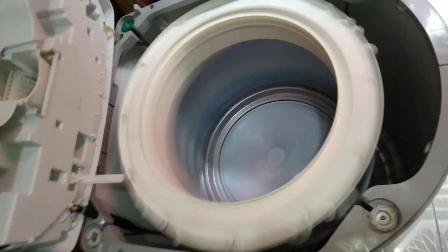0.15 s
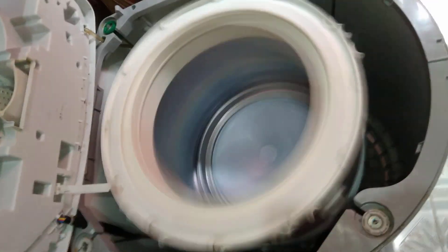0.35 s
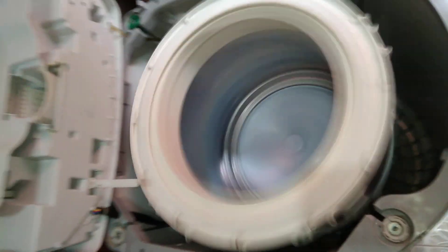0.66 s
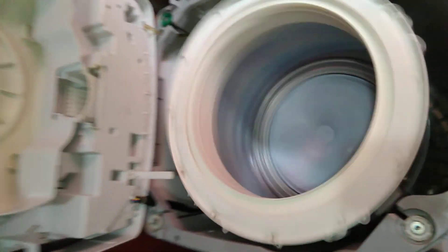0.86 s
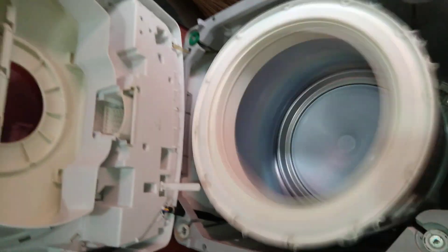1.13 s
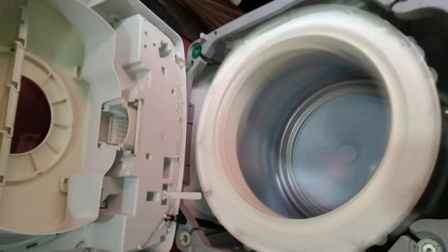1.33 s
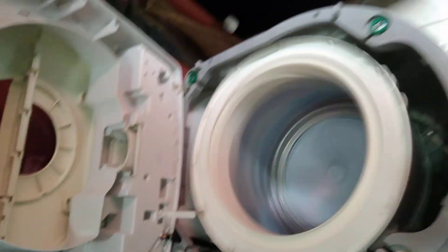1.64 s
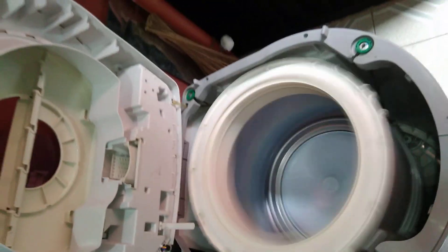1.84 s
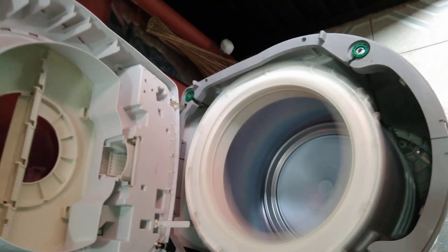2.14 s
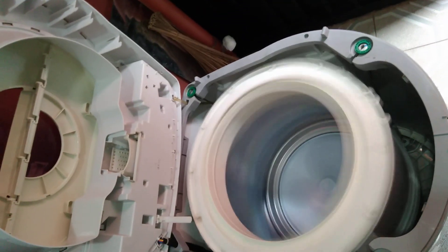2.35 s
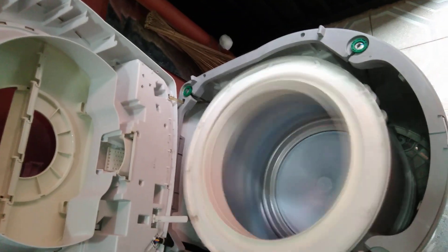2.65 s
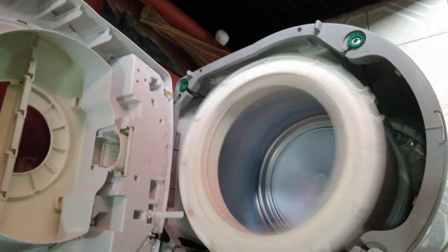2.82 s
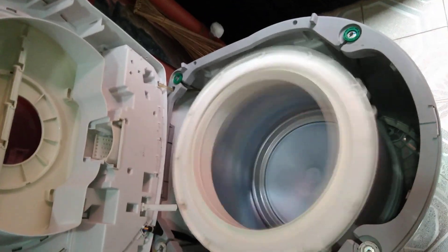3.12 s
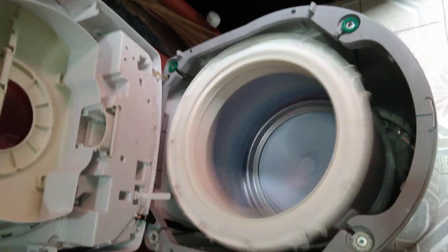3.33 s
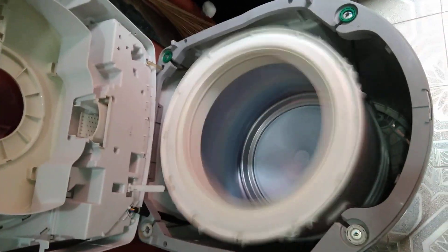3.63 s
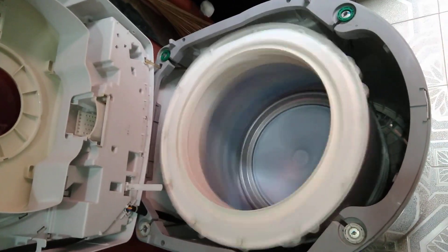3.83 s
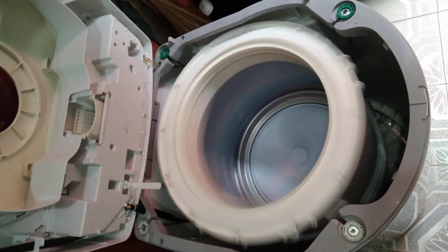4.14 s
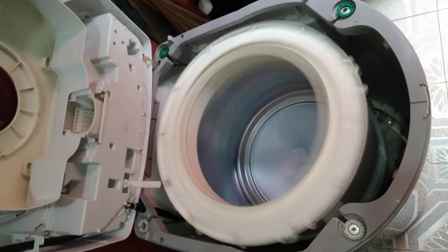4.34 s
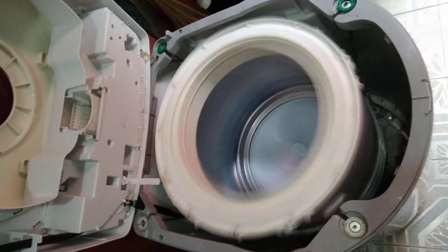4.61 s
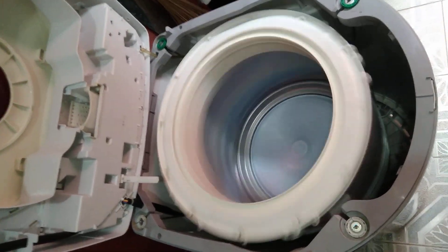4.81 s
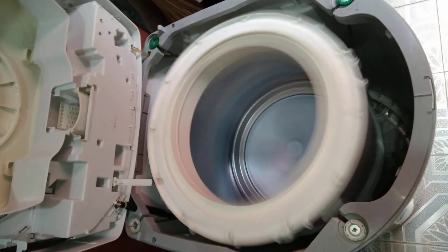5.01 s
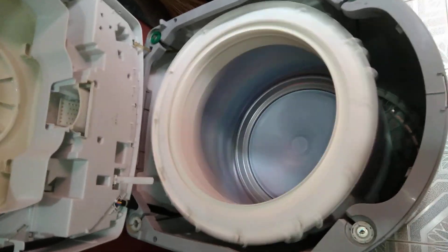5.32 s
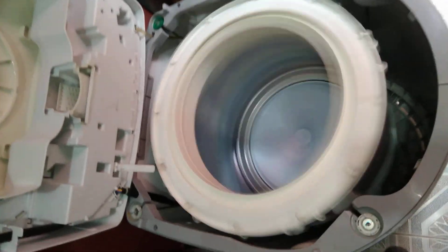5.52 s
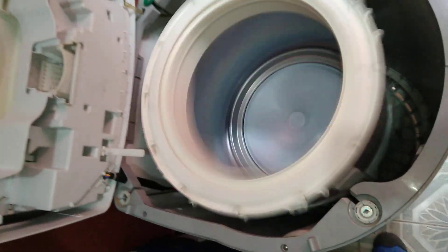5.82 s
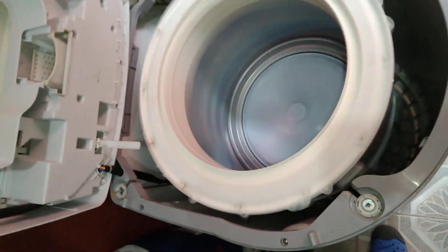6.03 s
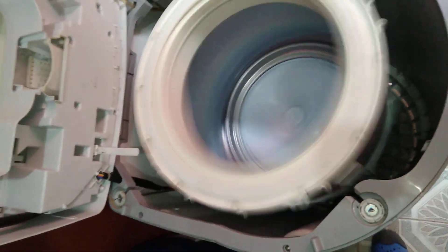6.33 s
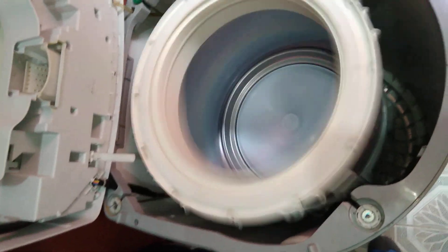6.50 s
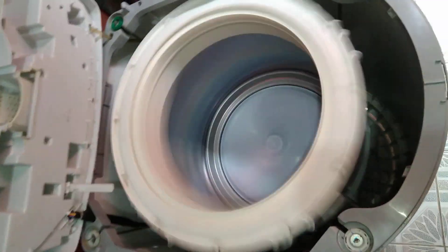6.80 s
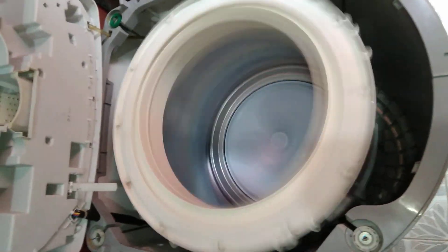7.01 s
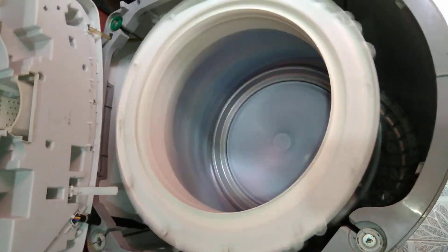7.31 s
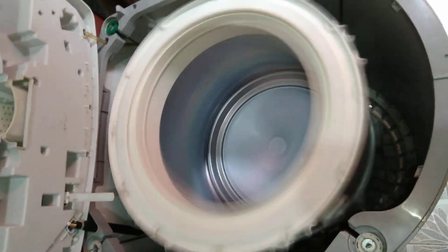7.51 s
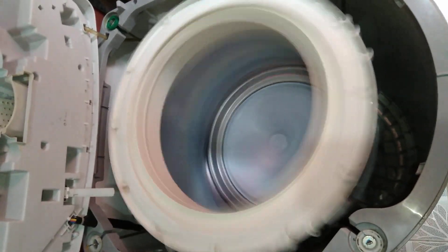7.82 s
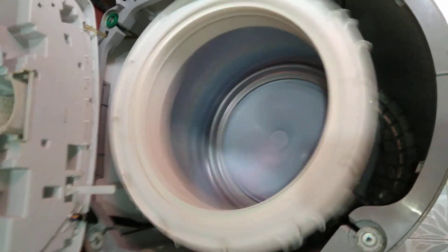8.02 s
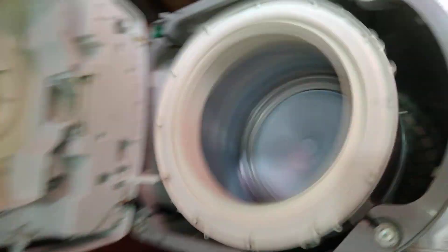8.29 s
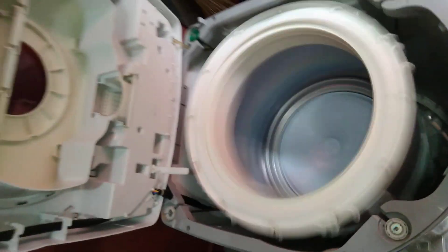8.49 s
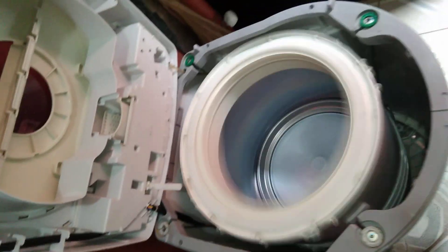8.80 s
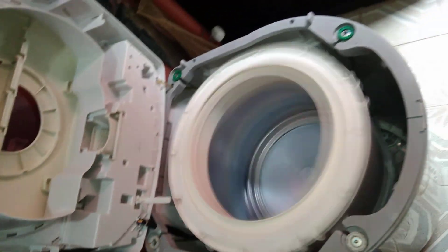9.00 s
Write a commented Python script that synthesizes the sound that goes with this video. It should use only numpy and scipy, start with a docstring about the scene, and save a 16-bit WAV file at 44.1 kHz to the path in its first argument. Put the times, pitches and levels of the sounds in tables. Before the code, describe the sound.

Fast, rhythmic metal clattering from a spinning washer tub drops to quiet knocking, then returns as the motor pulls again.

```python
"""A top-loading washer with its cover off spins an empty tub. At first the motor hums, the cabinet booms,
and a loose part slaps four times a turn, rattling through the tub and the sheet-metal cabinet.
From about 3.3 s the tub coasts: the same contact only knocks softly over a faint whir. Faint, brief high
chirps follow the knocks, and the level dips a few times. Near 5.8 s the motor pulls again and the
suspension groans. The slaps come back, a few at first, then steadily from about 7.4 s."""
import sys
import numpy as np
from scipy import signal
from scipy.io import wavfile
from scipy.ndimage import uniform_filter1d

SR = 44100
rng = np.random.default_rng(int(sys.argv[2]) if len(sys.argv) > 2 else 0)


def persist_wave(psi):
    """Save psi, clipped to +-1, as 16-bit WAV."""
    counts = np.round(np.clip(psi, -1, 1) * 32767).astype(np.int16)
    wavfile.write(sys.argv[1], SR, np.atleast_2d(counts).T)


N = 403515

# Whir of bearings and air: t/s, level/dB, extra treble/dB
WHIR_LEVELS = [(0.0, -13, 3.5), (0.84, -18.5, 1), (2.62, -13.5, 7), (2.93, -24, 0), (3.11, -24, -6.5),
               (3.67, -37.5, -3.5), (4.7, -40, 1.5), (5.2, -40, -1), (5.81, -35, -0.5), (5.94, -42.5, -1),
               (6.6, -44, -0.5), (7.0, -41, 2.5), (7.45, -36, -5.5), (7.65, -23.5, -7.5), (8.36, -23, -1),
               (9.15, -17, 5)]
# Tone colour of the whir: f/Hz, level/dB
WHIR_COLOUR = [(18, -42), (30, -12.5), (134, -2.5), (204, -1), (822, -13.5), (1160, -7), (1320, -21.5),
               (1500, -10.5), (1760, -12), (2120, -13.5), (2680, -25), (5400, -28), (6900, -24.5),
               (10000, -23), (12000, -43), (16000, -39.5)]
# How far the tub has turned: t/s, angle/turns
TUB_TURNS = [(-0.27, -1), (2.837, 9), (6.473, 20), (7.135, 22), (9.37, 29)]
# Base pitch of the magnetic hum, which sounds at twice and three times this: t/s, f/Hz
HUM_PITCH = [(0, 60.17), (3.2, 59.44), (5.8, 58.96), (9.15, 59.27)]
# Motor sounds: t/s, low hum/dB, cabinet boom/dB, high hum/dB
MOTOR_LEVELS = [(0.0, -22.5, -26, -20), (0.76, -19.5, -25.5, -22.5), (2.0, -24.5, -24.5, -25.5),
                (2.72, -28, -21.5, -25.5), (2.82, -31, -31, -22), (3.08, -36, -22, -30),
                (3.17, -41, -31, -51), (3.3, -42, -29, -42), (3.5, -55, -56, -63), (3.9, -51, -44, -61),
                (4.2, -53, -58, -66), (5.73, -51, -65, -52.5), (5.79, -42, -26.5, -35),
                (5.9, -36, -35, -36), (5.96, -26, -27.5, -37), (6.16, -29, -39, -43),
                (6.29, -22.5, -25.5, -43), (6.46, -23.5, -29, -28.5), (6.8, -28, -28.5, -36),
                (7.02, -22, -29, -42), (7.09, -21.5, -26, -27.5), (7.7, -20, -24.5, -26),
                (7.8, -20.5, -29, -20.5), (9.15, -27, -26, -20)]
# Swell once a turn, a row each for low hum, boom and high hum: depth/dB, loudest at/turns
MOTOR_SWELL = [(1.0, 0.2), (2.5, 0.29), (4.0, 0.065)]
# Deep modes of the cabinet (a mode is a pitch at which a thing likes to ring): f/Hz, width/Hz, level/dB
BOOM_MODES = [(92, 14, -12), (112, 14, -17), (148.6, 30, 0), (236, 8, -19)]
# Groans of the suspension: t/s, low mode/dB, high mode/dB
GROANS = [(5.8, -41, -44.5), (5.975, -56, -61), (6.14, -43.5, -40), (6.395, -34, -47), (6.48, -39, -32),
          (6.62, -64, -54), (6.75, -62, -45), (6.97, -42, -45), (7.15, -48, -40), (7.385, -52, -33)]
# The two modes that groan: f/Hz, width/Hz
GROAN_MODES = [(610, 94), (872, 89)]
# Pitches of the faint high chirps: f/Hz, level/dB
HIGH_CHIRPS = [(4500, -70), (5000, -71), (6350, -60), (6650, -62), (7300, -63), (7700, -62), (8900, -65),
               (9650, -66), (11300, -72), (12800, -71), (13200, -72), (14000, -76), (14800, -73)]
# Soft knocks: t/s, level/dB, then added to that level: bottom mode/dB, low modes/dB, upper modes/dB
KNOCKS = [(3.3692, -31.5, -14, -2, -2), (3.4396, -53, -24, 18, 8), (3.469, -30, -32, -4, 6.5),
          (3.5339, -38, -26, 0, -16), (3.594, -30.5, -2.5, -9, -7), (3.683, -26.5, -11.5, -7, -3.5),
          (3.7509, -29, -26, -11, -15), (3.848, -27, -28, -15, -11), (3.9204, -30, -25, -4.5, -13),
          (4.007, -31.5, -7, -2, -4), (4.081, -28, -5.5, -8, -14), (4.146, -31.5, 4, -6.5, -13),
          (4.249, -24.5, -20, -3.5, -9.5), (4.336, -22.5, -18, -6.5, -10.5), (4.406, -33.5, 1, -4, -5),
          (4.4832, -38, -6, -9, -7), (4.576, -34, -12, -5, -9), (4.6605, -28, -7, -11, -10),
          (4.736, -34.5, -10, -17, -22), (4.8179, -37, -19, -13, -13), (4.9038, -36, -24, -15, -11),
          (4.9906, -31, -12, -6, -21), (5.0754, -35.5, -18, -6, -12), (5.1587, -37.5, -13, -6, -15.5),
          (5.242, -34, -23, -9, -8.5), (5.3224, -38, -18.5, -23, -4), (5.494, -32, -5, -25, -22),
          (5.587, -40.5, -24, 7.5, -22), (5.7673, -50.5, 0.5, -11, 18.5), (6.189, -51, -4, 1, -7),
          (6.6957, -48, -17, 5, 3.5), (6.778, -47, -26, -10, 0), (6.8483, -40, -8, 5, -7),
          (6.9396, -35, -15, 2.5, -12), (7.27, -52, -10, -3, -5)]
# Modes of the tub under a knock: f/Hz, width/Hz, level/dB
TUB_MODES = [(279.5, 38, 6.5), (713, 21, -16.5), (992, 100, 7.5), (1145, 70, 4), (1491, 59, 5.5),
             (2010, 290, 0), (2125, 150, 2), (2348, 45, -3), (4370, 250, -6), (4870, 390, -12),
             (6510, 400, -9.5), (7240, 400, 0.5), (8130, 350, -0.5), (8940, 570, -5)]
# Panel tones kept going by the slaps: f/Hz, level next to the slap/dB, phase wander/rad
PANEL_TONES = [(204, -32, 0.39), (224.8, -30.5, 0.47), (291, -28, 0.78), (332.8, -30.5, 0.53)]
# Slaps of the loose part: t/s, treble level/dB
SLAPS = [(0.0383, 0), (0.115, 0), (0.202, -5), (0.277, 0), (0.352, 0), (0.427, -1.5), (0.512, -4.5),
         (0.5906, -1.5), (0.6633, 0.5), (0.7385, 0), (0.822, -3.5), (0.901, -1), (0.975, 1), (1.0492, -0.5),
         (1.1323, -5), (1.2105, -1.5), (1.286, 0.5), (1.3594, 0.5), (1.4433, -7), (1.522, -2.5),
         (1.5954, -1), (1.667, -0.5), (1.745, -1.5), (1.8312, -3), (1.905, 0), (1.978, 0), (2.0587, -5.5),
         (2.141, -4.5), (2.2147, 0), (2.2895, -1), (2.366, -1.5), (2.4515, -4), (2.524, 0), (2.5993, -0.5),
         (2.674, -2.5), (2.761, -5.5), (2.8374, -6.5), (2.9143, -4.5), (2.994, -6.5), (3.0705, -6.5),
         (3.1494, -22), (3.2228, -8.5), (3.2994, -27.5), (6.392, -8), (6.4729, -16.5), (7.0564, -4.5),
         (7.135, -5), (7.2094, -27), (7.381, -4.5), (7.46, -6), (7.5425, -9.5), (7.6264, -26),
         (7.704, -3.5), (7.7822, -4.5), (7.8623, -10), (7.942, -12), (8.0224, -4), (8.1004, -3.5),
         (8.179, -5), (8.261, -8), (8.34, -2), (8.42, -2.5), (8.4936, -6), (8.5756, -7), (8.6573, -4),
         (8.734, -2.5), (8.8098, -4), (8.8914, -7), (8.973, -2.5), (9.05, -1), (9.1232, -3)]
# Light touch just ahead of a slap, next to the slap itself; one row before the coast, one after:
# level/dB for each of the four quarters of a turn
FIRST_TOUCH = [(-9, -13.5, -12, -8), (-6, -7, -19, -19)]
# Tone colour of a slap: f/Hz, level/dB
SLAP_COLOUR = [(140, -35), (230, -24), (290, -9.5), (365, -5.5), (539, -9.5), (783, -11), (1590, 1),
               (2080, -5.5), (2960, -13), (5420, -36), (7460, -4), (10300, -20), (12300, -46), (16000, -5)]
# How long the rattle takes to fade by 60 dB: f/Hz, fade time/s
RATTLE_FADE = [(250, 0.44), (1000, 0.15), (3000, 0.25), (8000, 0.15), (15000, 0.043)]
# Cabinet modes that stand out of the rattle: f/Hz, width/Hz, level/dB
CABINET_MODES = [(272, 18, -9), (381, 8.8, -10.5), (546, 39, -8), (1445.5, 43, -3), (1960, 120, 0),
                 (2148, 140, -0.5), (2690, 84, -15), (4290, 650, -15), (4750, 720, -15.5), (6400, 440, -12),
                 (6970, 260, -9.5), (7545, 94, -10.5), (8200, 120, -14.5), (9290, 250, -16.5),
                 (10300, 360, -14.5), (15000, 1200, -18.5)]
# Brief dips of the whole sound: start t/s, end t/s, level/dB
DIPS = [(4.831, 4.892, -9.5), (4.926, 4.985, -10), (5.124, 5.154, -14), (5.175, 5.226, -13),
        (5.347, 5.488, -10), (5.653, 5.767, -12)]


def from_db(db):
    """Turn decibels into a number to multiply by."""
    return 10 ** (np.asarray(db) / 20)


def rms_one(x):
    """Scale a signal so that its average strength (rms) is 1."""
    return x / np.sqrt(np.mean(x ** 2) + 1e-20)


def in_time(rows):
    """Join a table's points with straight lines: one curve for each column after the time."""
    times, *columns = np.transpose(rows)
    return [np.interp(np.arange(N) / SR, times, column) for column in columns]


def at_hz(points, hz):
    """Look up a table's value at a pitch, with octaves evenly spaced."""
    pitches, values = np.transpose(points)
    return np.interp(np.log(hz), np.log(pitches), values)


def drift(rate_hz):
    """A smooth random wobble of about size 1."""
    pole = np.exp(-80 * np.pi * rate_hz / SR)
    slow = signal.lfilter([1], [1, -2 * pole, pole * pole], rng.standard_normal(N // 40 + 2002))[2000:]
    return np.interp(np.arange(N) / 40, np.arange(len(slow)), rms_one(slow))


def resonance(x, hz, width_hz):
    """Let through only the part of a sound that lies near one pitch."""
    pole = np.exp(-np.pi * width_hz / SR)
    gain = (1 - pole * pole) / 2
    return signal.lfilter([gain, 0, -gain], [1, -2 * pole * np.cos(2 * np.pi * hz / SR), pole * pole], x)


def pitched_noise(hz, width_hz):
    """Noise sent twice through one resonance, so that it almost sings."""
    return rms_one(resonance(resonance(rng.standard_normal(N), hz, width_hz), hz, width_hz))


def noise_bands(low_hz):
    """Slices of noise a third of an octave wide, each with its middle pitch."""
    edges, white = low_hz * 2 ** (np.arange(40) / 3), rng.standard_normal((2, N))
    edges = edges[edges < 17000]
    for k, (low, high) in enumerate(zip(edges, edges[1:])):
        band = signal.butter(2, [low, high], "band", fs=SR, output="sos")
        yield np.sqrt(low * high), signal.sosfilt(band, white[k % 2])


def wavering_tone(hz, db, wander_rad):
    """A tone that is slightly unsteady in pitch."""
    return np.sqrt(2) * from_db(db) * np.sin(2 * np.pi * hz * np.arange(N) / SR + wander_rad * drift(6.4))


def hit_shape(times, level_db, fade_s, rise_s, hold_s, touch_db, tail_db, tail_s):
    """Loudness of hits: light touch, rise, hold, quick fade, room tail. Fade times are for 60 dB."""
    rate = SR / 8
    starts = np.round(np.asarray(times) * rate).astype(int)
    hold, lead = max(int(hold_s * rate), 1), int(0.0067 * rate)
    chatter, release = np.zeros((2, N // 8 + hold + 2)) + 1e-18
    for start, power, touch in zip(starts, from_db(2 * level_db), from_db(2 * (level_db + touch_db))):
        chatter[max(start - lead, 0):start] += touch
        chatter[start:start + hold] += power
        release[start + hold] += power
    quick, slow = (signal.lfilter([1], [1, -from_db(-120 / (s * rate))], release) for s in (fade_s, tail_s))
    tail, rise = min(from_db(2 * tail_db), 1), np.exp(-1 / (rise_s * rate))
    power = signal.lfilter([1 - rise], [1, -rise], chatter + (1 - tail) * quick + tail * slow)
    return np.repeat(np.sqrt(power), 8)[:N]


def whir():
    """Bearings and air make a smooth rushing noise as the tub turns."""
    level_db, treble_db = in_time(WHIR_LEVELS)
    shared_drift, air = drift(24), np.zeros(N)
    for hz, noise in noise_bands(60.64):
        flicker_db = 2.0 * (shared_drift + drift(25))
        treble_share = np.clip(np.log2(hz / 1100), 0, 1)
        air += from_db(at_hz(WHIR_COLOUR, hz) + flicker_db + treble_db * treble_share) * noise
    return from_db(level_db - 7.0) * rms_one(air)


def floor_rumble():
    """The floor shakes, a little more when the motor's low hum is louder."""
    band = signal.butter(3, [38, 60], "band", fs=SR, output="sos")
    rumble = rms_one(signal.sosfilt(band, rng.standard_normal(N)))
    low_hum_db = in_time(MOTOR_LEVELS)[0]
    return from_db(-41.5 + 0.27 * low_hum_db) * rumble


def motor():
    """Magnetic pull hums at two pitches and uneven drive makes the cabinet boom; all swell once a turn."""
    turns, = in_time(TUB_TURNS)
    low_db, boom_db, high_db = [
        db + depth_db * np.cos(2 * np.pi * (turns - loudest_at)) + 0.63 * drift(9.0)
        for db, (depth_db, loudest_at) in zip(in_time(MOTOR_LEVELS), MOTOR_SWELL)]
    phase = 2 * np.pi * np.cumsum(in_time(HUM_PITCH)[0]) / SR + 0.25 * drift(13.0)
    low_hum = from_db(low_db + 1.9 * drift(21)) * np.sin(2 * phase)
    high_hum = from_db(high_db + 1.9 * drift(27)) * np.sin(3 * phase + 0.47 * drift(6))
    boom = wavering_tone(hz=145, db=-1.4, wander_rad=1.0)
    boom += sum(from_db(db) * pitched_noise(hz, width_hz) for hz, width_hz, db in BOOM_MODES)
    return np.sqrt(2) * (low_hum + high_hum) + from_db(boom_db) * boom


def suspension_groans():
    """The suspension rubs in short strokes while the tub gathers speed."""
    times, *levels = np.transpose(GROANS)
    out = np.zeros(N)
    for db, mode in zip(levels, GROAN_MODES):
        shape = hit_shape(times, db, fade_s=0.29, rise_s=0.004, hold_s=0.022,
                          touch_db=-8, tail_db=-6, tail_s=1.0)
        out += shape * pitched_noise(*mode)
    return out


def high_chirps():
    """Faint, brief high chirps sound at randomly picked pitches just after each knock."""
    times, out = np.transpose(KNOCKS)[0], np.zeros(N)
    boost_db = 6.0 * (times > 6.5)   # louder after 6.5 s
    for hz, db in HIGH_CHIRPS:
        pick, lateness, strength = rng.random((len(times), 3)).T
        picked = pick < 0.5
        starts = times + 0.01 + 0.06 * lateness
        level_db = db + 4.0 * (2 * strength - 1) + boost_db
        shape = hit_shape(starts[picked], level_db[picked], fade_s=0.2, rise_s=0.002, hold_s=0.015,
                          touch_db=-30, tail_db=-30, tail_s=0.2)
        out += shape * pitched_noise(hz, width_hz=140)
    return out


def knocks():
    """A soft, grainy scrape sets the tub ringing, with a different mix of low and high each time."""
    times, level_db, bottom_db, low_db, upper_db = np.transpose(KNOCKS)
    middle_db, metal_db = upper_db - 2.5, -15 + 1.94 * upper_db
    groups_db = [bottom_db, low_db, 0, middle_db, upper_db, metal_db]
    group_edges_hz = [400, 1070, 1300, 1700, 3000]
    out = np.zeros(N)
    for hz, width_hz, mode_db in TUB_MODES:
        hit_db = level_db + groups_db[np.searchsorted(group_edges_hz, hz)] + rng.normal(0, 2.1, len(times))
        shape = hit_shape(times, hit_db, fade_s=0.26, rise_s=0.0013, hold_s=0.012,
                          touch_db=-5.5, tail_db=-5, tail_s=0.35 if hz < 3000 else 0.2)
        out += from_db(mode_db - 10.0) * pitched_noise(hz, width_hz) * shape
    grain = from_db(2.2 * drift(45))
    return grain * out


def panel_ringing():
    """Little holds the panels still, so they ring on from slap to slap."""
    times, treble_db = np.transpose(SLAPS)
    shape = hit_shape(times, treble_db, fade_s=0.35, rise_s=0.011, hold_s=0.034,
                      touch_db=-31.5, tail_db=-39.5, tail_s=0.5)
    return shape * sum(wavering_tone(*tone) for tone in PANEL_TONES)


def slaps():
    """Each slap shakes many loose parts into a burst of rattling noise, which makes the cabinet ring."""
    times, treble_db = np.transpose(SLAPS)
    ring_luck, thud_luck, touch_luck = rng.standard_normal((len(times), 3)).T
    ring_db = np.minimum(-15 - 0.59 * treble_db, -9.5) + ring_luck   # softer slaps: a bigger share of ring
    thud_db = -8 - thud_luck
    quarter = np.round(4 * np.interp(times, *np.transpose(TUB_TURNS))).astype(int) % 4
    after_coast = (times > 5.0).astype(int)
    touch_db = np.array(FIRST_TOUCH)[after_coast, quarter] + 1.5 * touch_luck

    def strength_db(hz):
        """Level of each slap at one pitch, from low thud through tub ring to treble."""
        thud_share = np.clip(np.log2(900 / hz) + 0.5, 0, 1)
        ring_share = np.clip(1 - abs(np.log2(hz / 1700)), 0, 1)
        return treble_db + thud_share * thud_db + ring_share * ring_db

    out = np.zeros(N)
    for hz, noise in noise_bands(227.1):
        shape = hit_shape(times, strength_db(hz), at_hz(RATTLE_FADE, hz), rise_s=0.003, hold_s=0.002,
                          touch_db=touch_db, tail_db=-16.5, tail_s=0.33)
        out += from_db(at_hz(SLAP_COLOUR, hz) + 3.2 * drift(38) + 6.5) * shape * noise
    for hz, width_hz, mode_db in CABINET_MODES:
        hit_db = strength_db(hz) + rng.normal(0, 1.93, len(times))
        shape = hit_shape(times, hit_db, at_hz(RATTLE_FADE, hz), rise_s=0.0016, hold_s=0.0031,
                          touch_db=touch_db, tail_db=-9.5, tail_s=0.44)
        ringing = rms_one(resonance(rng.standard_normal(N), hz, width_hz))
        out += from_db(mode_db - 8.5) * ringing * shape
    return out


def scene():
    """All the sounds together in one channel, heard close above the tub."""
    loose_part = slaps() + panel_ringing() + knocks()
    return (loose_part + high_chirps() + suspension_groans() + motor() + whir() + floor_rumble())[None, :]


def record(dry):
    """The level dips briefly in the quiet stretch, peaks are rounded and the highest treble is cut."""
    dip_db, t = np.zeros(N), np.arange(N) / SR
    for start, end, db in DIPS:
        dip_db[(t >= start) & (t < end)] = db
    dipped = dry * from_db(uniform_filter1d(dip_db, size=200))
    rounded = 0.85 * np.tanh(dipped / 0.85)
    treble_cut = signal.ellip(12, 0.3, 68, 15750, fs=SR, output="sos")
    return signal.sosfilt(treble_cut, rounded)


dry = scene()
out = record(dry)
persist_wave(out)
```